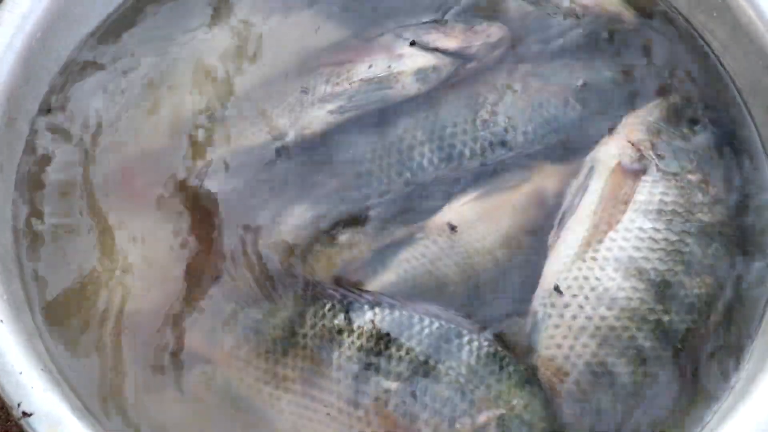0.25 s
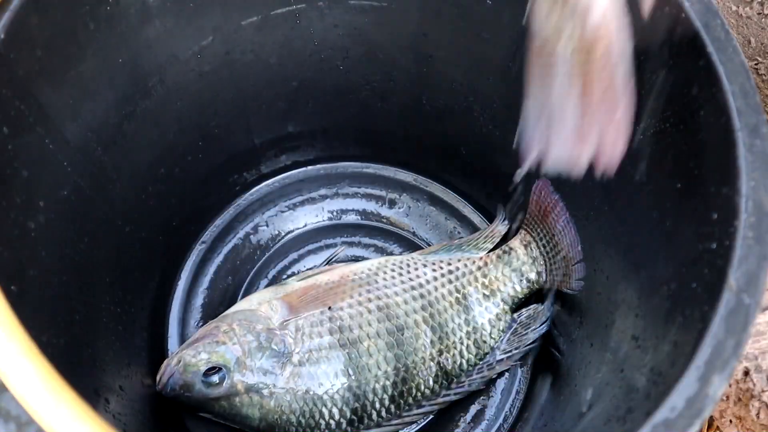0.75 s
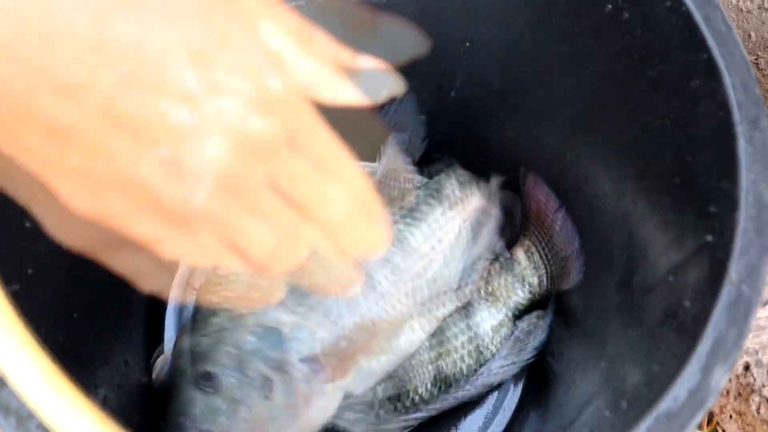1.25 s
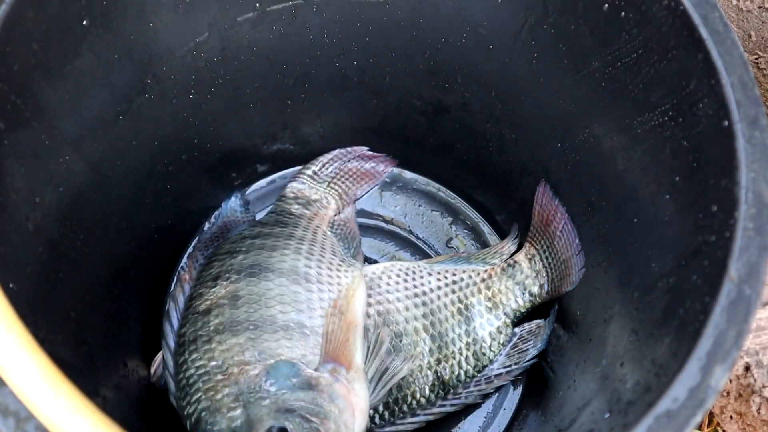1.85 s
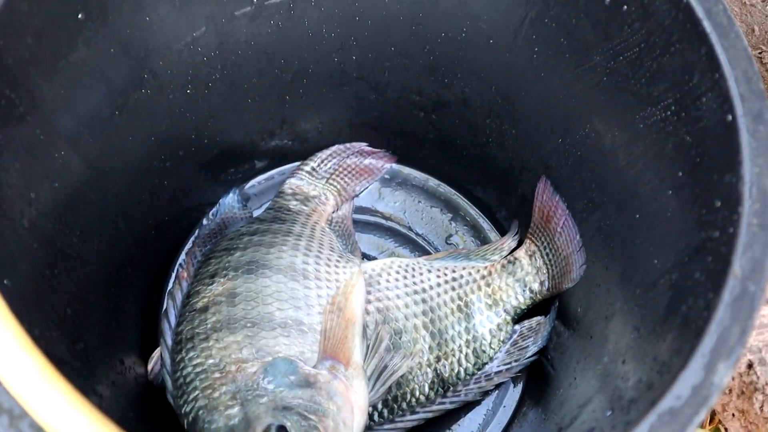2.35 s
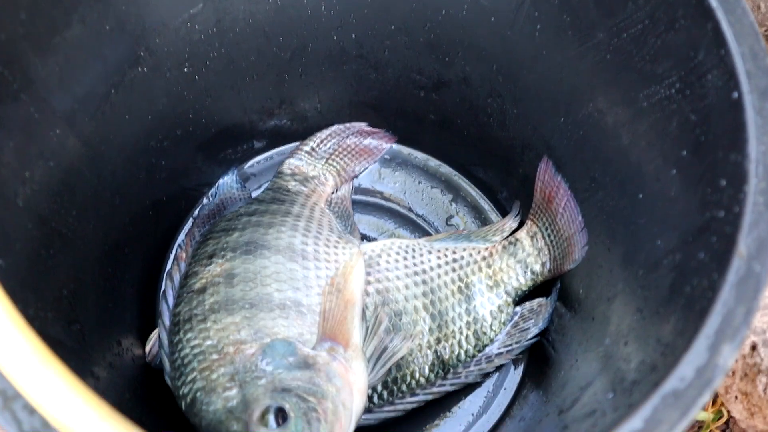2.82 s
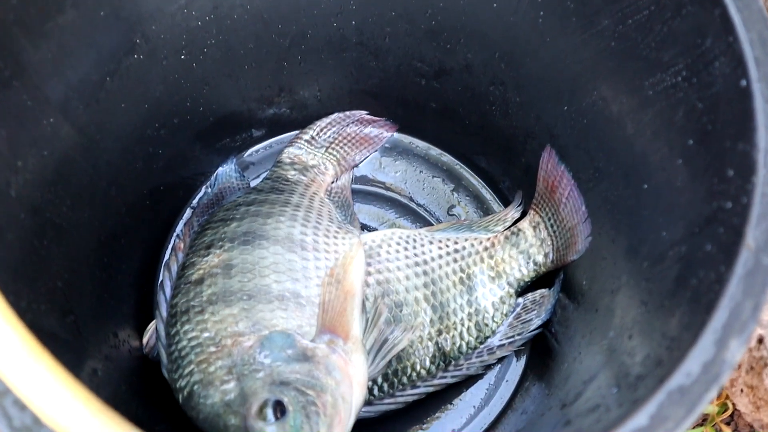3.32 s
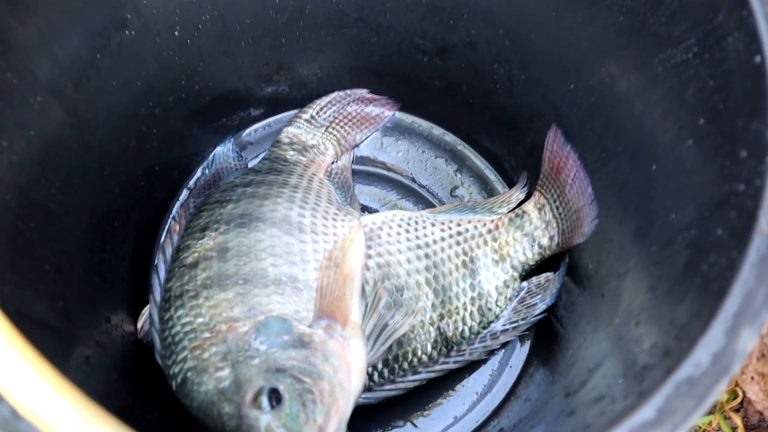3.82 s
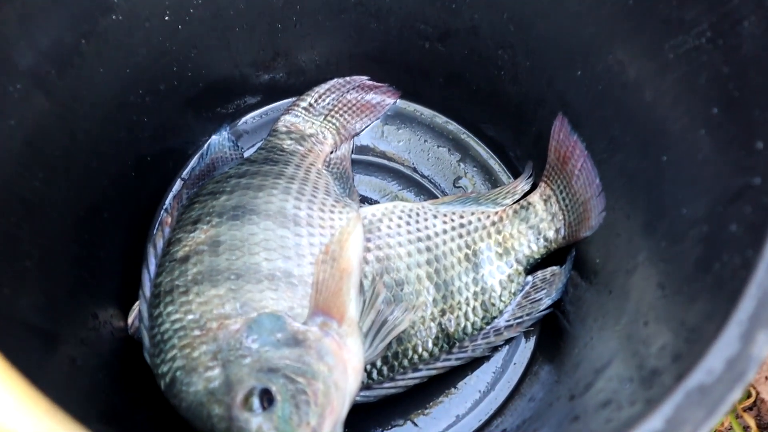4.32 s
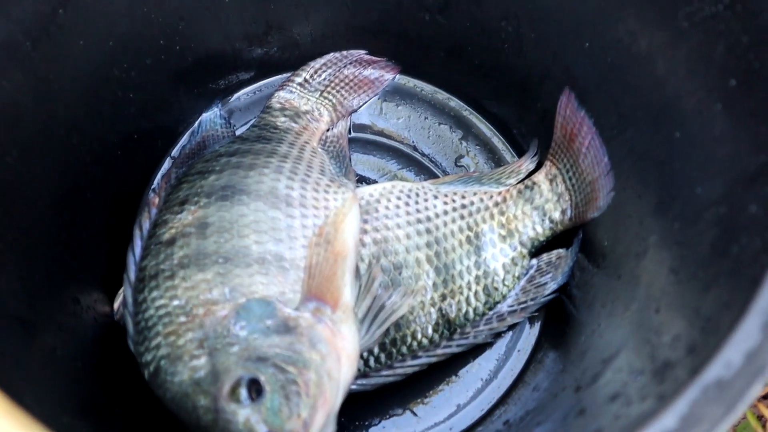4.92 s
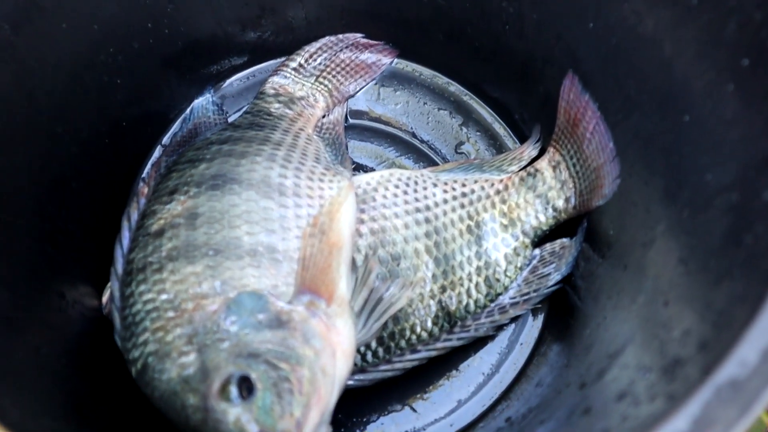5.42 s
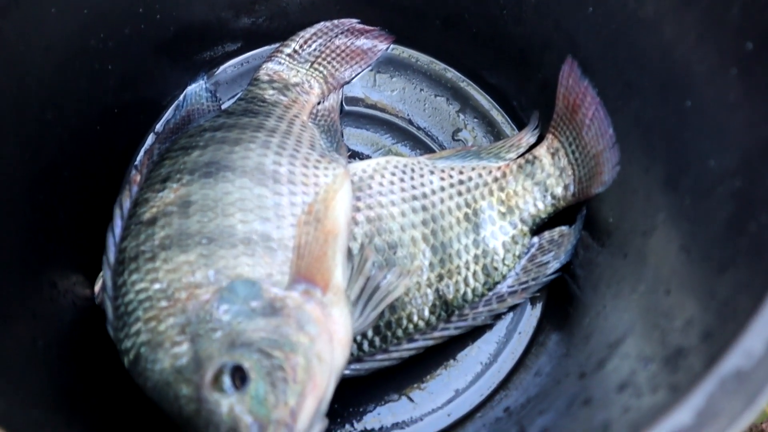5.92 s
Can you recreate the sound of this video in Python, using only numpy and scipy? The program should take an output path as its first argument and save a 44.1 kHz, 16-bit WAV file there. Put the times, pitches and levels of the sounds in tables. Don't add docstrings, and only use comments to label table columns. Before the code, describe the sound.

Close outdoor stereo sound: faint distant rumble and a high insect chorus behind wet handling. After a brief near insect buzz ends, water pops and drops crackle, then one very loud fish flop knocks the plastic bucket walls with fin snaps. Afterwards uneven sloshing, a crisp water smack, small drips, a lull with gurgling bubbles, then another sharp smack and vigorous splashing that settles.

```python
import sys
import numpy as np
from scipy import signal
from scipy.fft import rfft, irfft, next_fast_len
from scipy.io import wavfile
from scipy.ndimage import uniform_filter1d

SR = 44100
rng = np.random.default_rng(int(sys.argv[2]) if len(sys.argv) > 2 else 0)


def gain_from_db(level_db):
    decades = np.asarray(level_db, float) / 20
    return 10 ** decades


def dump(signal):
    limited = np.clip(np.atleast_2d(signal).T, -1, 1)
    pcm = np.round(limited * 32767).astype(np.int16)
    wavfile.write(sys.argv[1], SR, pcm)


N = 272097
TIME = np.arange(N) / SR
FAST = next_fast_len(N)
FREQ = np.maximum(np.fft.rfftfreq(FAST, 1 / SR), 1)
CUT_S = 0.6


def on_log(table, hz):
    table_hz, value = np.transpose(table)
    return np.interp(np.log(hz), np.log(table_hz), value)


def unit(x):
    return x / np.sqrt(np.mean(x ** 2) + 1e-30)


def band(x, hz, width_hz):
    low_hz = max(np.sqrt(hz ** 2 + width_hz ** 2 / 4) - width_hz / 2, 20)
    high_hz = min(low_hz + width_hz, 0.45 * SR)
    return signal.sosfilt(signal.butter(1, [low_hz, high_hz], "band", fs=SR, output="sos"), x)


def walk(rate_hz):
    k = int(SR / rate_hz)
    held = np.repeat(rng.standard_normal(N // k + 1), k)
    return 1.54 * uniform_filter1d(uniform_filter1d(held, k), k)[:N]


def add(out, s, x):
    i = int(s * SR)
    out[..., i:i + x.shape[-1]] += x[..., :N - i]


def fall(t, t60_s, attack_s=0.00016):
    return (1 - np.exp(-t / attack_s)) * np.exp(-np.log(1000) * t / max(t60_s, 0.002))


def yard(swell_db=0.77, flicker_db=1.34):
    # (frequency [Hz], level [dB per Hz])
    mid_spectrum = [(12, -38), (20, -10), (103, 1.5), (357, -15.5), (889, -20), (1210, -21.5), (1730, -25),
                    (2550, -29.5), (5690, -31), (6530, -33.5), (8620, -25.5), (9900, -29), (11000, -37),
                    (13400, -44), (15000, -47)]
    # (frequency [Hz], level [dB per Hz])
    side_spectrum = [(12, -48), (20, -21), (229, -4.5), (497, -4.5), (587, -6.5), (674, -5.5),
                     (1830, -10.5), (2850, -14.5), (4430, -14.5), (5380, -19.5), (7300, -13.5), (8620, -5),
                     (9370, -10), (11700, -28), (15000, -33)]
    # (frequency [Hz], gain [dB])
    early_tilt = [(100, 0.5), (1000, 0), (3000, -0.5), (6000, -0.5), (9000, -7.5)]
    mid_db, side_db = -43, -46.5
    shape = np.array([gain_from_db(on_log(mid_spectrum, FREQ)), gain_from_db(on_log(side_spectrum, FREQ))])
    spec = rfft(rng.standard_normal((2, FAST))) * shape
    out = 0
    for hz in 30 * 2. ** np.arange(10):
        share = np.clip(1 - np.abs(np.log2(FREQ / hz)), 0, 1)
        db = swell_db * walk(1.71) + flicker_db * walk(9) + on_log(early_tilt, hz) * (TIME < CUT_S)
        out = out + irfft(spec * share, FAST)[:, :N] * gain_from_db(db)
    mid = unit(out[0]) * gain_from_db(mid_db)
    side = unit(out[1]) * gain_from_db(side_db)
    return np.array([mid + side, mid - side])


def insect():
    throb = (0.5 + 0.5 * np.cos(2 * np.pi * 106.4 * TIME)) ** 0.8
    buzz = unit(band(band(rng.standard_normal((2, N)), 9300, 830), 8800, 1000)) * throb
    note = unit(band(rng.standard_normal((2, N)), 4276, 40)) * gain_from_db(-25 * TIME)
    mid, side = (gain_from_db(-54.5) * buzz + gain_from_db(-60) * note) * (TIME < CUT_S)
    return np.array([mid + 1.7 * side, mid - 1.8 * side])


def ring_cavities(table, wobble=0.045):
    out, t = np.zeros(N), TIME[:5000]
    noise = rng.standard_normal((len(table), len(t)))
    for (s, db, hz, t60_s, splash_db, *rise), z in zip(table, noise):
        unsteady = 1 + wobble * unit(uniform_filter1d(z[::-1], size=90))
        pitch_hz = np.minimum(hz * 2 ** (sum(rise) * t) * unsteady, 2.1 * hz)
        fade_at_top = np.clip(8 * (2.1 - pitch_hz / hz), 0, 1)
        tone = np.sin(2 * np.pi * np.cumsum(pitch_hz) / SR) * fall(t, t60_s) * fade_at_top
        splash = 0.49 * unit(band(z, 1.27 * hz, 2.3 * hz)) * fall(t, 1.13 * t60_s)
        add(out, s, gain_from_db(db) * (tone + gain_from_db(splash_db) * splash))
    return out


def small_bubbles(table, t60_s, splash_db):
    ring_slope, rise_oct_s = 0.47, 3.64
    rows = [(s, db, hz, t60_s * (hz / 2000) ** -ring_slope, splash_db, rise_oct_s) for s, db, hz in table]
    return ring_cavities(rows)


def wet_pops():
    # (time [s], peak level [dB], pitch [Hz])
    pop_rows = [(.279, -43.5, 2360), (.569, -37.5, 2130), (.9, -42, 1590), (.954, -33.5, 2110),
                (1.02, -27.5, 3250), (1.074, -34, 2880), (1.18, -38.5, 1470), (1.284, -29, 1180),
                (1.554, -45, 1130), (1.584, -35.5, 1145), (2.399, -32, 1630), (2.412, -18.5, 1820),
                (2.449, -26, 1980), (2.478, -24, 3260), (2.669, -33, 1215), (2.835, -47, 1620),
                (3.32, -37, 1650), (3.454, -40, 1450), (4.232, -40, 3150), (5.109, -38, 2800),
                (5.165, -20, 3960), (5.179, -31, 1020), (5.205, -29.5, 1960), (5.681, -42, 2350),
                (5.772, -39, 1505), (5.935, -37, 2450), (6.006, -33, 3820), (6.114, -33.5, 2670),
                (6.139, -40, 2770)]
    return small_bubbles(pop_rows, t60_s=0.037, splash_db=1)


def effort():
    # (time [s], basin ring level [dB])
    stir = [
        (.7, -79),
        (1.7, -66),
        (2.6, -64),
        (3.6, -56),
        (4.2, -57.5),
        (4.5, -82),
        (5.6, -55.5),
        (6.1, -62.5),
    ]
    # (time [s], length [s], basin ring level [dB], spray minus ring [dB])
    strokes = [(1.225, 0.1, -40.5, -1.5), (1.345, 0.05, -32.5, -5), (2.241, 0.099, -42, 1),
               (2.397, 0.1, -36, -12), (2.48, 0.069, -41, -2), (2.675, 0.16, -51, 0),
               (3.33, 0.14, -45, -10), (5.166, 0.061, -48, 11), (5.243, 0.079, -32.5, -1.5),
               (5.345, 0.21, -38, -2), (5.795, 0.1, -48, -3)]
    # (time [s], length [s], basin ring level [dB], spray minus ring [dB])
    sloshes = [(.81, 0.027, -55, -20), (.98, 0.12, -48.5, -9), (1.57, 0.011, -53, 2),
               (1.93, 0.073, -46.5, -16), (2.02, 0.013, -48, 2.5), (3.08, .03, -53.5, -9),
               (3.17, 0.028, -47.5, -1.5), (3.78, 0.073, -53, 2), (3.88, 0.041, -45, -6),
               (4.12, 0.032, -64, 10), (4.87, 0.15, -68, 6), (5.08, 0.074, -55, -8),
               (5.44, 0.044, -41.5, -3), (5.56, 0.022, -41.5, -4.5), (1.27, .06, -37, 0),
               (4.9, .03, -60.5, 15), (5.72, 0.055, -54, -17), (6.12, 0.028, -61, 4)]
    stroke_rise_db_s, slosh_rise_db_s = 1500, 221
    tire_db_s, lift_db_s = 56.5, 454
    stir_spray_db = -5.5
    t = TIME[::32]
    stir_db = np.interp(t, *np.transpose(stir), left=-90)
    ring, spray = gain_from_db(2 * stir_db), gain_from_db(2 * (stir_db + stir_spray_db))
    for table, rise_db_s in ((strokes, stroke_rise_db_s), (sloshes, slosh_rise_db_s)):
        for s, length_s, db, spray_db in table:
            rise = rise_db_s * np.maximum(s - t, 0)
            tire = tire_db_s * np.clip(t - s, 0, length_s)
            lift = lift_db_s * np.maximum(t - s - length_s, 0)
            level_db = db - rise - tire - lift
            ring = ring + gain_from_db(2 * level_db)
            spray = spray + gain_from_db(2 * (level_db + spray_db))
    return [np.interp(TIME, t, 10 * np.log10(power + 1e-30)) for power in (ring, spray)]


def crackle(rate_per_s=580, level_db=-4.5, spread_db=3.5):
    size = gain_from_db(spread_db * np.minimum(rng.exponential(size=N), 4.0)) * np.sign(rng.standard_normal(N))
    clicks = size * (rng.random(N) < rate_per_s / SR)
    return gain_from_db(level_db) * unit(band(clicks, 5200, 8500))


def scrub(grain_db=2.0, flicker_db=2.2, upper_db=-4.5):
    # (frequency [Hz], width [Hz], level [dB])
    basin_modes = [(1800, 810, 16), (2500, 1300, 1), (1360, 1200, 5), (700, 96, 10.5)]
    ring_db, spray_db = effort()
    size = gain_from_db(grain_db * np.minimum(rng.exponential(size=N), 4.0))
    grains = rng.standard_normal(N) * size * (rng.random(N) < 0.25)
    ring = unit(sum(gain_from_db(db) * band(band(grains, hz, w), hz, 1.22 * w) for hz, w, db in basin_modes))
    upper = unit(band(band(grains[::-1], 3140, 660), 4760, 2600))
    spray = unit(band(band(np.roll(grains, 9000), 5700, 9800), 6900, 13000))
    layers = ((ring, ring_db), (upper, ring_db + upper_db), (spray + crackle(), spray_db))
    return sum(x * gain_from_db(db + flicker_db * walk(110)) for x, db in layers)


def patter(count=420, patter_db=-53, spread_db=4.0, start_s=0.75):
    out, t = np.zeros(N), TIME[:500]
    for u, v, w in rng.random((count, 3)):
        hz = 1800 * 2 ** (2.41 * v)
        chirp = np.sin(2 * np.pi * hz * t * (1 + 25 * t)) * fall(t, 45 / hz, 0.0001)
        db = patter_db - spread_db * np.log(w + 0.012)
        add(out, start_s + u * (TIME[-1] - start_s), gain_from_db(db) * chirp)
    return out


def noise_bursts(table, share):
    out, t = np.zeros(N), TIME[:3000]
    noise = rng.standard_normal((len(table), len(t)))
    for (s, db, hz, t60_s), z in zip(table, noise):
        burst = (np.sign(z) + 0.5 * z) * fall(t, t60_s, 0.0003)
        x = band(band(burst, hz, share * hz), hz, 2.5 * share * hz)
        add(out, s, gain_from_db(db) * x / np.abs(x).max())
    return out


def drops():
    # (time [s], peak level [dB], centre [Hz])
    drop_rows = [(0.761, -32, 5700), (0.983, -32, 5500), (1.011, -23.5, 7900), (1.072, -27.5, 8040),
                 (1.142, -24.5, 8100), (1.1865, -31, 5140), (1.2055, -23.5, 5960), (1.34, -29, 4300),
                 (1.399, -12.5, 4470), (1.45, -21.5, 2400), (1.556, -37, 6100), (1.5831, -28, 4480),
                 (1.885, -28, 11000), (2.039, -26, 4420), (2.2385, -27, 5070), (2.3967, -17.5, 4460),
                 (2.6628, -20.5, 10300), (2.735, -23, 8900), (3.514, -22.5, 7900), (3.6984, -21, 5700),
                 (3.7817, -28, 9570), (4.0461, -24.5, 8050), (4.1054, -25, 5240), (4.117, -24, 6900),
                 (4.3818, -31, 4300), (4.511, -24, 8100), (4.633, -26.5, 10500), (4.8, -25.5, 5500),
                 (4.8736, -27, 5600), (4.8952, -16, 11100), (4.9917, -23, 10400), (5.047, -30, 8100),
                 (5.2425, -25, 4040), (5.689, -32, 10500), (5.713, -25, 4330), (5.749, -24.5, 10800),
                 (5.8104, -23, 9900), (5.866, -27.5, 5260), (6.03, -26.5, 7000), (6.11, -28.5, 8900),
                 (6.1342, -19, 6500),
                 (1.126, -36, 3520), (3.32, -24.5, 3800), (3.6133, -30, 4650), (3.95, -32, 4260),
               (3.9739, -34, 4860), (4.004, -31, 5550), (4.169, -30, 4320), (4.596, -38, 4220),
               (4.722, -33, 6580), (5.1168, -34, 8720), (5.565, -30, 7040), (4.127, -38, 3820),
               (4.137, -30.5, 4200), (4.2, -38, 4800), (4.43, -38, 5000), (4.545, -43, 4800),
               (4.675, -37, 4000), (4.875, -39, 3630), (5.86, -33, 6200), (5.984, -38, 6200),
               (5.999, -34, 7000), (5.7814, -27.5, 5520), (5.999, -39, 4010), (6.0617, -32, 5500),
               (5.822, -29, 6900), (5.947, -32.5, 5430), (6.159, -20.5, 7600), (1.382, -20, 5500),
               (1.367, -14, 6200)]
    t60_s = 0.0091
    return noise_bursts([(*row, t60_s) for row in drop_rows], share=0.21)


def clear_bubbles():
    # (time [s], peak level [dB], pitch [Hz])
    bubble_rows = [(.926, -42, 1760), (.946, -34, 2960), (.963, -32.5, 3090), (2.039, -46, 1600),
                   (2.249, -29.5, 1894), (2.419, -23, 1890), (2.43, -33, 2030), (.997, -38.5, 660),
                   (1.043, -40, 1830), (2.728, -34.5, 1714), (3.39, -25, 3170), (3.511, -35, 3210),
                   (3.613, -27, 1538), (3.708, -32, 2240), (3.769, -42, 1195), (3.864, -35, 1186),
                   (4.078, -32, 1783), (4.103, -37, 1650), (4.125, -45, 1030), (4.185, -42.5, 1053),
                   (4.381, -46, 1400), (4.4715, -49, 1320), (4.578, -47, 3170), (4.69, -47.5, 975),
                   (4.925, -47, 1500), (4.088, -42, 2720), (5.793, -46, 2200), (6.12, -46, 1750),
                   (5.996, -41.5, 3140), (5.683, -43, 3700), (4.493, -43, 3280), (4.542, -44, 1790),
                   (4.595, -41.5, 3630), (4.63, -47, 1016), (5.069, -40, 2300), (5.805, -32.5, 1106),
                   (5.834, -30, 1480), (6.062, -35.5, 3300)]
    return small_bubbles(bubble_rows, t60_s=0.058, splash_db=-5)


def water_smacks():
    # (time [s], peak level [dB], centre [Hz], t60 [s])
    smack_rows = [(3.613, -33, 2500, .02), (.947, -33, 2820, 0.036), (1.178, -40, 1500, .02),
                  (2.2395, -33, 2470, 0.055), (2.397, -25, 1800, 0.023), (2.4, -33, 596, 0.054),
                  (2.4125, -10.5, 2590, 0.024), (2.42, -27, 1770, .04), (2.418, -18, 2000, 0.034),
                  (2.426, -21, 1900, 0.043), (2.431, -19, 2000, 0.037), (2.478, -32, 650, 0.068),
                  (3.51, -27.5, 3530, 0.022), (4.949, -38, 2280, 0.017), (5.118, -34.5, 2200, 0.024),
                  (5.141, -21, 4530, 0.019), (5.158, -16.5, 1250, 0.018), (5.16, -33.5, 290, 0.021),
                  (5.1585, -5, 7000, 0.008), (5.805, -32.5, 2360, 0.13), (5.84, -38, 2200, .08),
                  (.96, -41, 2000, .12)]
    return noise_bursts(smack_rows, share=0.51)


def glugs():
    # (time [s], peak level [dB], pitch [Hz], t60 [s], rise [octaves per s])
    glug_rows = [(.956, -36, 700, 0.089, -1.5), (1.215, -30, 1130, 0.083, 30.5),
                 (1.252, -28.5, 1550, 0.14, 10.5), (1.228, -32, 1200, .08, 11.5),
                 (1.265, -37, 1900, .08, 4.5), (1.4, -26, 1250, 0.11, -5.5), (4.235, -44.5, 3900, .15, -9),
                 (2.692, -38, 1400, 0.07, 20), (2.713, -32, 2340, 0.04, 28), (3.829, -35.5, 920, 0.16, 9.5),
                 (4.312, -38.5, 1166, 0.18, 22), (4.948, -24.5, 677, 0.077, 6.7),
                 (4.962, -35, 930, 0.29, 30), (4.971, -26.5, 1635, 0.033, 55), (4.981, -31, 1314, 0.2, 51),
                 (4.965, -42, 700, 0.64, -0.2), (5.5, -45, 1900, 0.054, 49), (4.951, -25, 1630, 0.015, 75),
                 (5.389, -28.5, 3900, .03, 45), (5.468, -30.5, 615, 0.026, 5)]
    splash_db = -10
    rows = [(s, db, hz, t60_s, splash_db, rise) for s, db, hz, t60_s, rise in glug_rows]
    return ring_cavities(rows, wobble=0.02)


def bucket(reach_octaves=0.66, side_wall_db=1):
    # (time [s], peak level [dB], struck pitch [Hz], slap minus thump [dB], slap t60 [s])
    flops = [(1.155, -31.5, 700, -20, 0.058), (1.177, -30, 302, -12.5, 0.22),
             (1.232, -26.5, 300, -12, 0.073), (1.286, -26.5, 300, -8, 0.32), (1.338, -5, 590, -4, 0.02),
             (1.351, -8.5, 546, -5.5, 0.043), (1.3567, -7, 900, -8, 0.016), (1.362, -10, 288, -14.5, 0.031),
             (1.369, -14.5, 294, -7.5, 0.044), (1.395, -10, 1100, -26, 0.037), (1.379, -21, 910, -12, .02),
             (1.401, -18.5, 497, -3.5, 0.048), (1.452, -22.5, 795, -10, 0.025),
             (1.457, -20, 1420, -9, 0.042), (1.556, -34, 600, -6, 0.26), (1.582, -24.5, 522, -14, 0.084)]
    # (frequency [Hz], level [dB], t60 [s])
    wall_modes = [(60, -8, .1), (113, -21, 0.14), (203, -0.5, 0.12), (271.4, 1.5, .055), (307, 1.5, 0.06),
                  (443, -14, 0.033), (636, 0, 0.016), (814, -6, 0.041), (1100, 2, 0.014), (1450, -1, 0.015)]
    # (time [s], peak level [dB], pitch [Hz], t60 [s], splash level [dB])
    fin_snaps = [
        (1.3441, 0.5, 2290, .014, -12),
        (1.3468, -13.5, 2300, 0.057, -6),
        (1.37, -25, 2500, 0.02, -4),
    ]
    out, t = np.zeros((2, N)), TIME[:9000]
    left_right = np.array([[-1], [1]])
    noise = rng.standard_normal((len(flops), 2, len(t)))
    for (s, db, centre_hz, slap_db, t60_s), z in zip(flops, noise):
        thump = 0
        for k, (hz, mode_db, mode_t60_s) in enumerate(wall_modes):
            level_db = mode_db - 7.8 * (np.log2(hz / centre_hz) / reach_octaves) ** 2
            lean = gain_from_db(side_wall_db * np.clip(np.log2(hz / 500), 0, 1.3) * left_right)
            tone = np.sin(2 * np.pi * hz * (1 + 0.04 * z[1, k]) * t)
            thump = thump + gain_from_db(level_db) * fall(t, mode_t60_s, 0.00039) * lean * tone
        crack = band(band(z - 0.41 * z[0] * left_right, 2300, 9900), 3200, 12500)
        squelch = 3.6 * band(z[0], 760, 750) * gain_from_db(2.5 * left_right)
        slap = gain_from_db(slap_db) * (crack + squelch) * fall(t, t60_s)
        add(out, s, gain_from_db(db) * (thump / np.abs(thump).max() + slap))
    return out + ring_cavities(fin_snaps) * gain_from_db(np.array([[-3.5], [0]]))


def echoes(x, wet_db, t60_s):
    t = TIME[:12000]
    tail = band(band(rng.standard_normal((2, len(t))), 1230, 5300), 1400, 15000) * fall(t, t60_s, 0.00029)
    tail = tail / np.sqrt(np.sum(tail[0] ** 2))
    return gain_from_db(wet_db) * signal.fftconvolve(np.atleast_2d(x), tail, axes=1)[:, :N]


def scene():
    # (frequency [Hz], lead [rad])
    port_lead = [(100, 0.5), (1800, 0.5), (3000, 1.29), (4400, 2.5), (7000, 2), (15000, 2.5)]
    notes = wet_pops() + clear_bubbles() + glugs()
    basin = scrub() + notes + patter() + drops() + water_smacks()
    turn = np.exp(0.5j * on_log(port_lead, FREQ) * np.array([[1], [-1]]))
    direct = irfft(rfft(basin, FAST) * turn, FAST)[:, :N] * gain_from_db(np.array([[1.6], [0.4]]))
    near = bucket()
    wet = echoes(basin, -10.5, 0.11) + echoes(near, -21.5, 0.55)
    return yard() + insect() + direct + near + wet


def roll_off(x):
    return signal.sosfilt(signal.butter(12, 15510, fs=SR, output="sos"), x)


def record(dry):
    dull = signal.sosfilt(signal.butter(3, 12500, fs=SR, output="sos"), dry)
    return roll_off(np.clip(dull, -1, 1))


dry = scene()
out = record(dry)
dump(out)
```